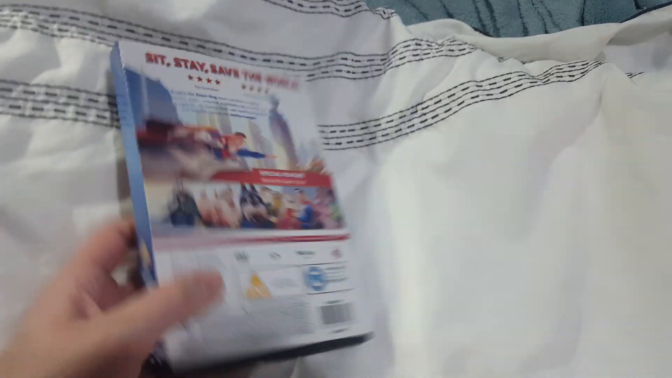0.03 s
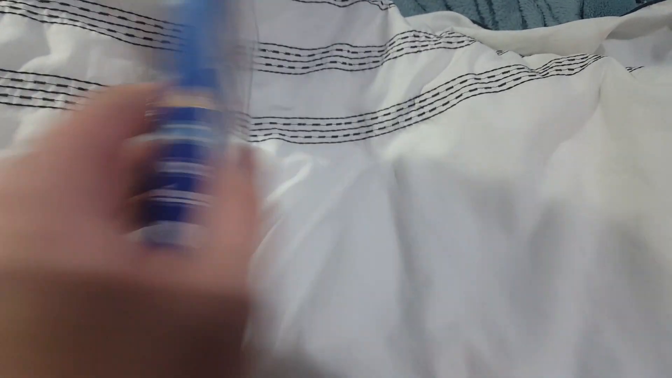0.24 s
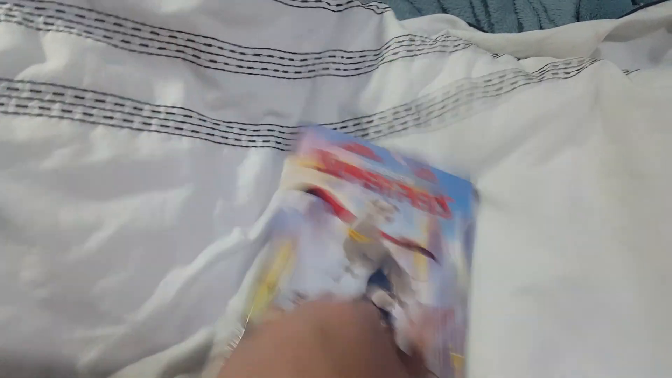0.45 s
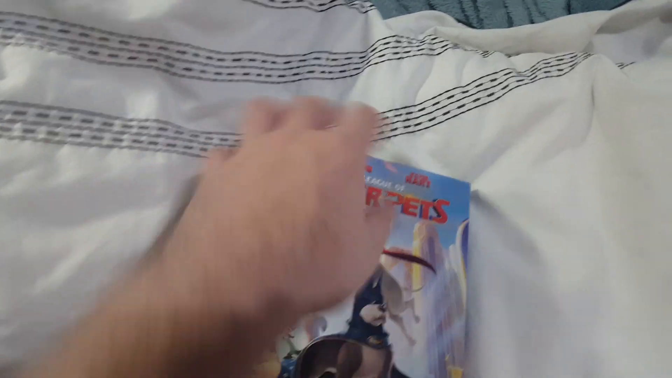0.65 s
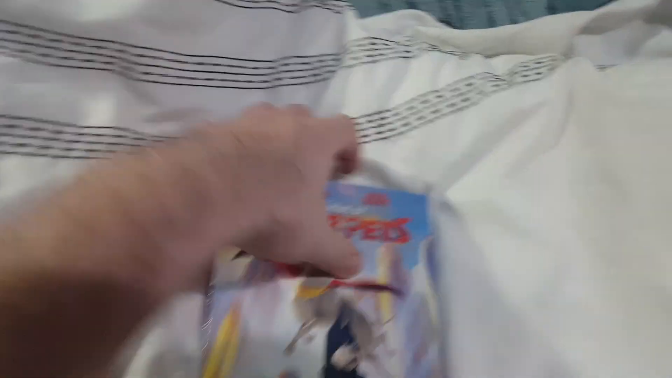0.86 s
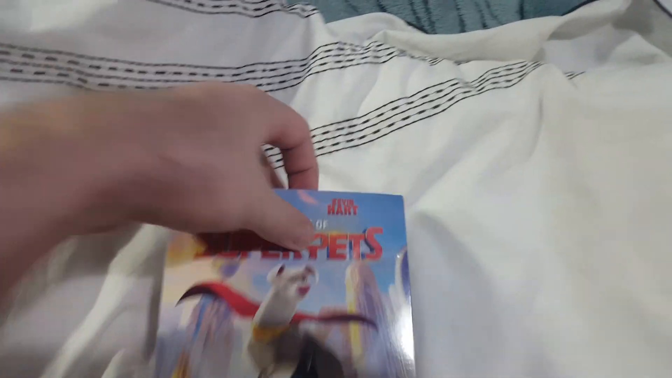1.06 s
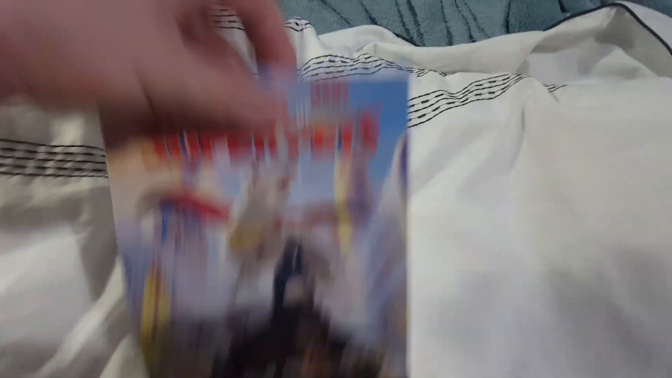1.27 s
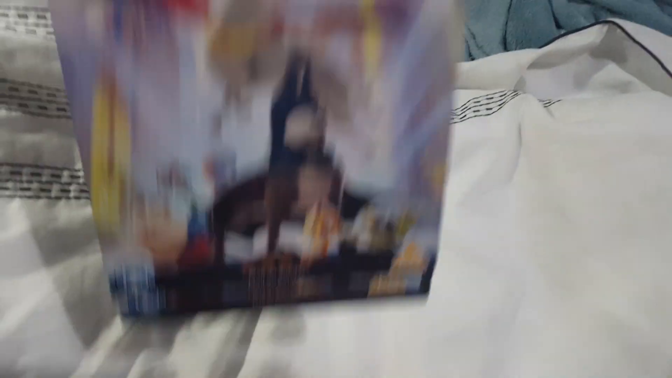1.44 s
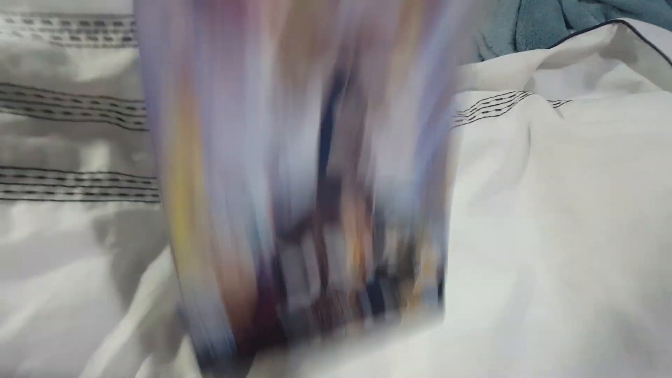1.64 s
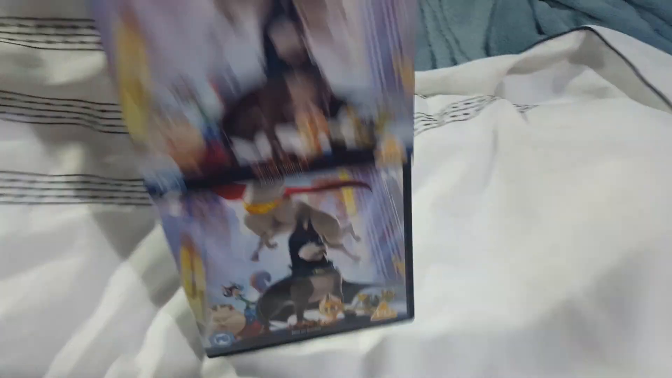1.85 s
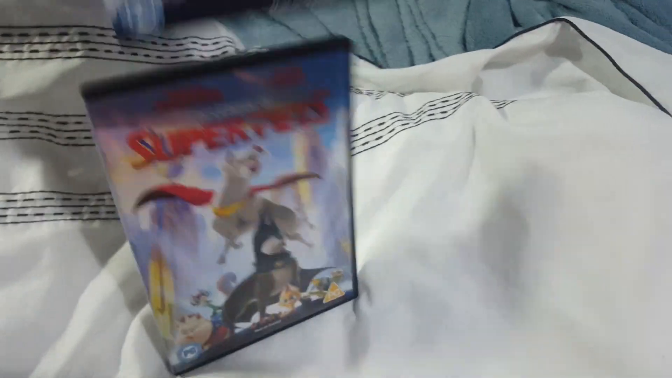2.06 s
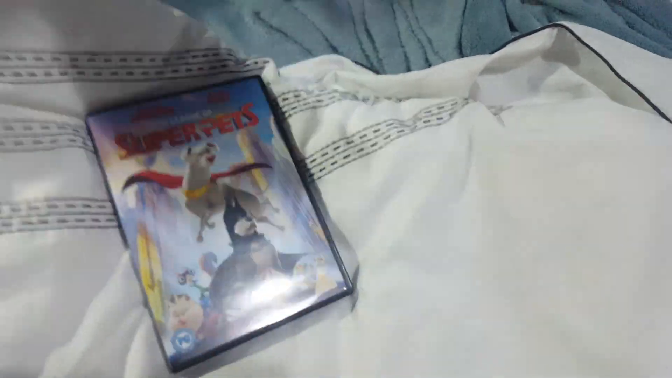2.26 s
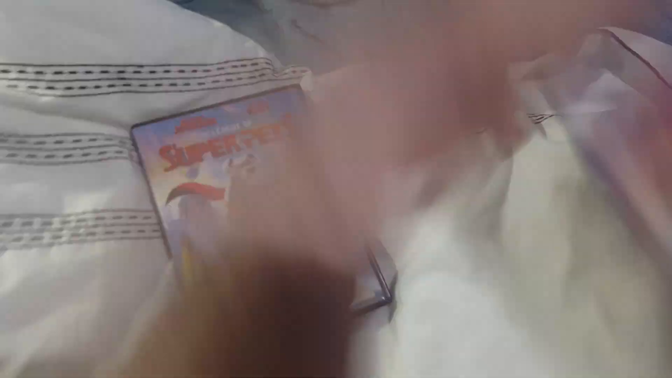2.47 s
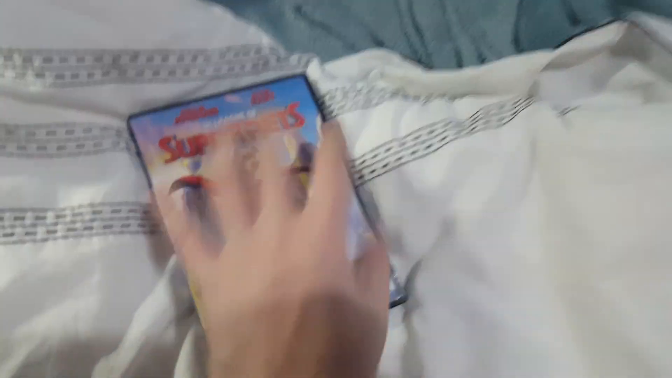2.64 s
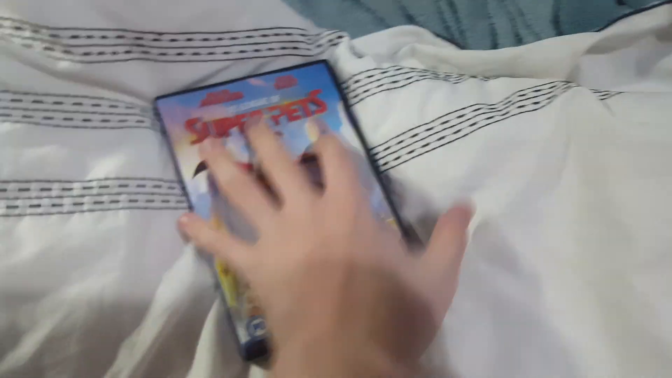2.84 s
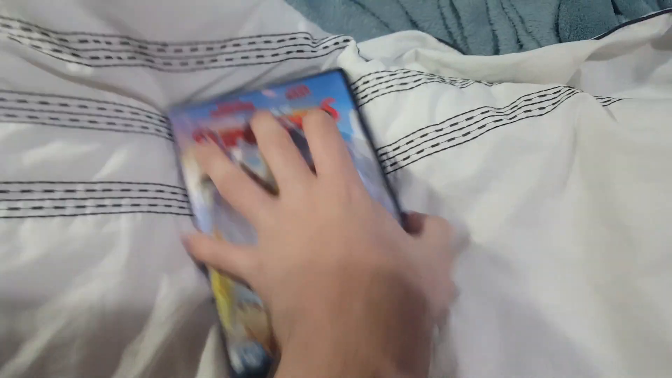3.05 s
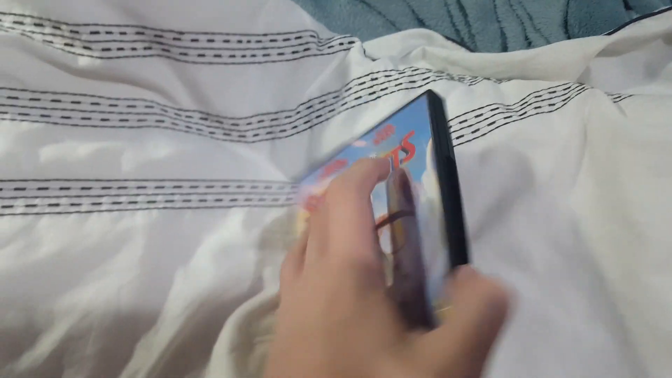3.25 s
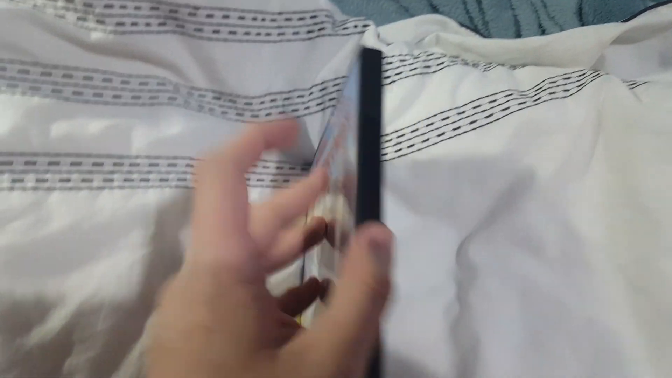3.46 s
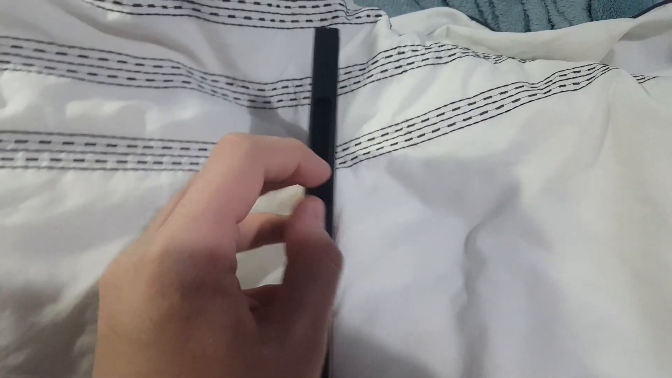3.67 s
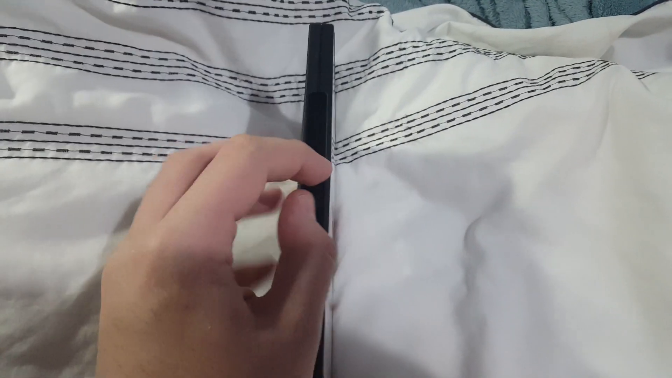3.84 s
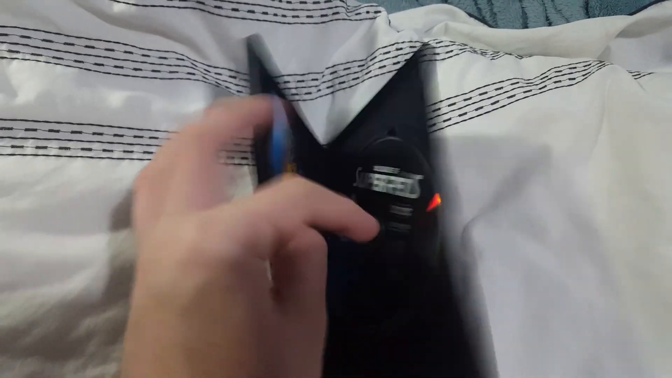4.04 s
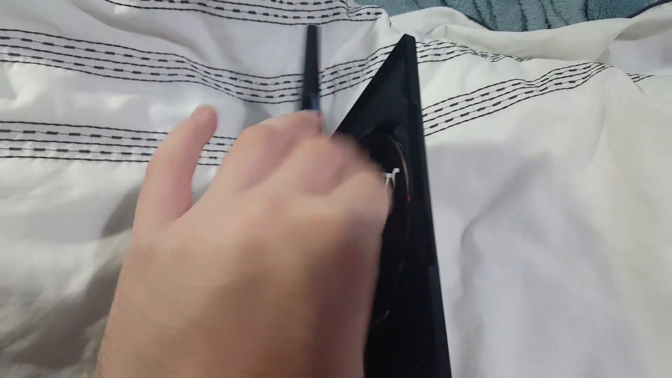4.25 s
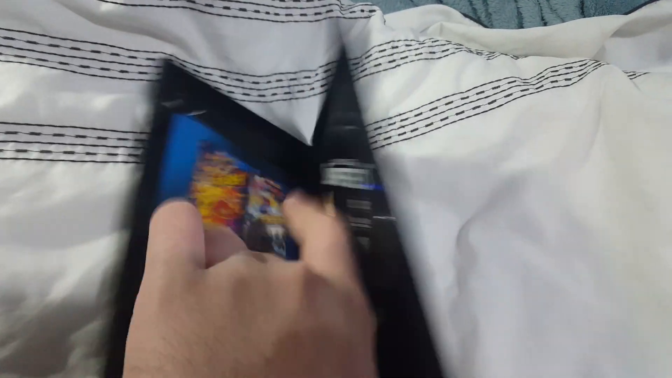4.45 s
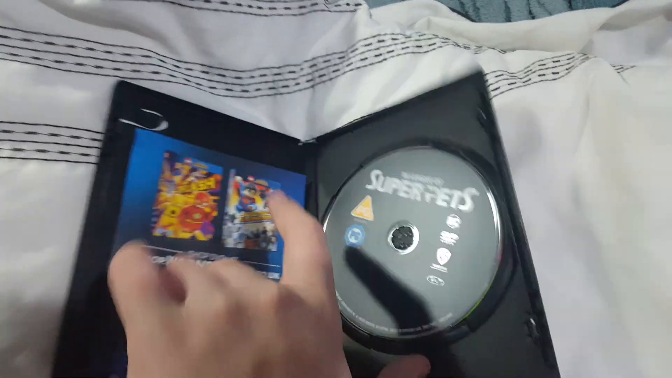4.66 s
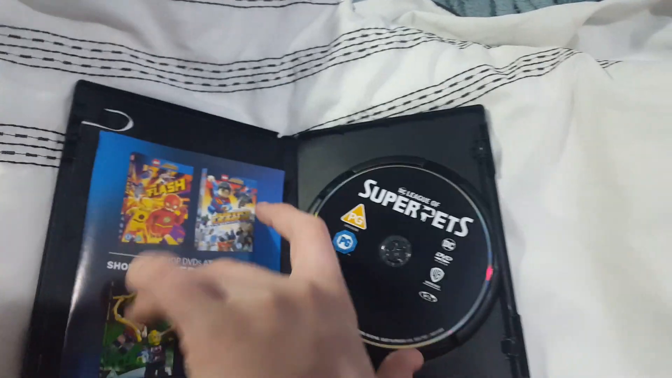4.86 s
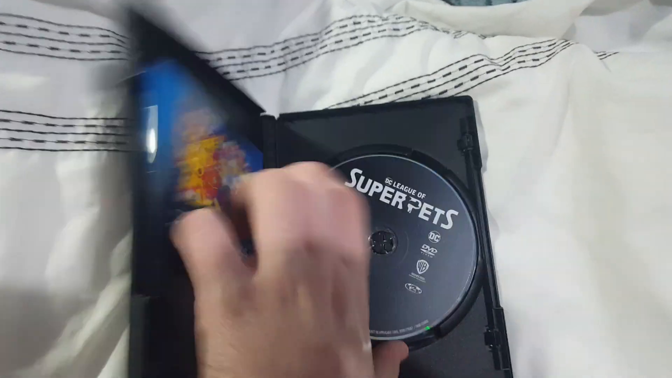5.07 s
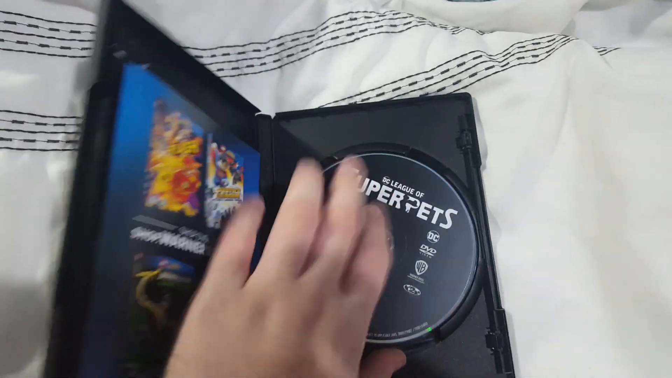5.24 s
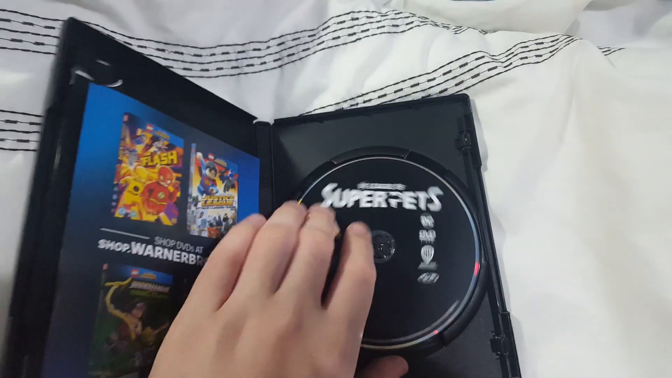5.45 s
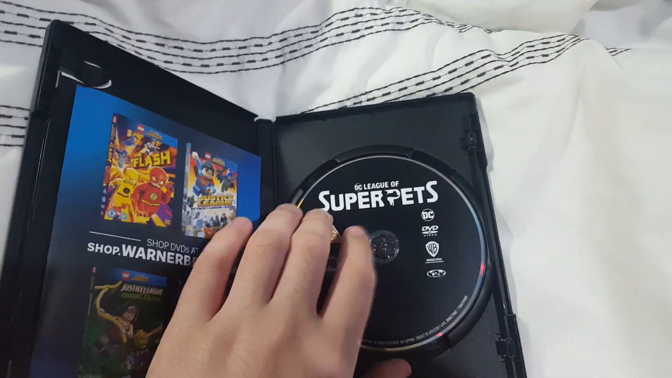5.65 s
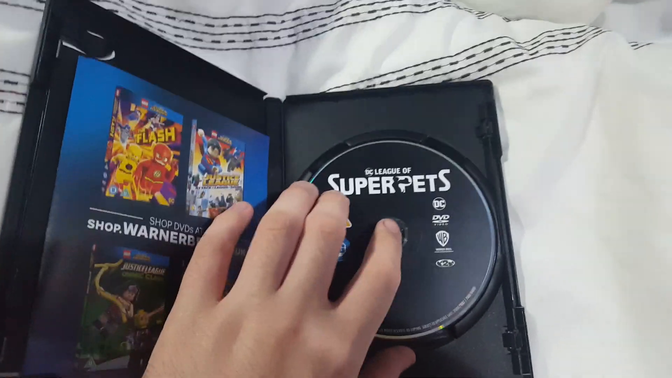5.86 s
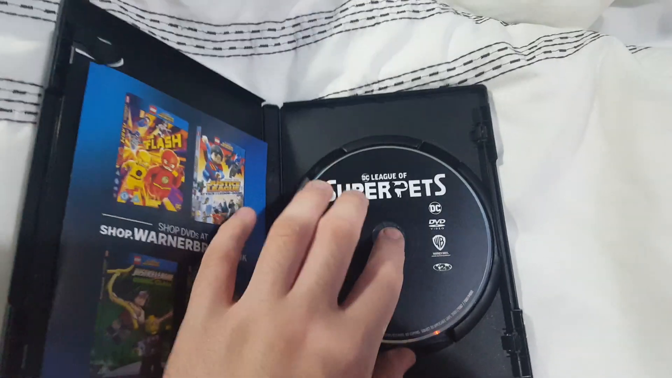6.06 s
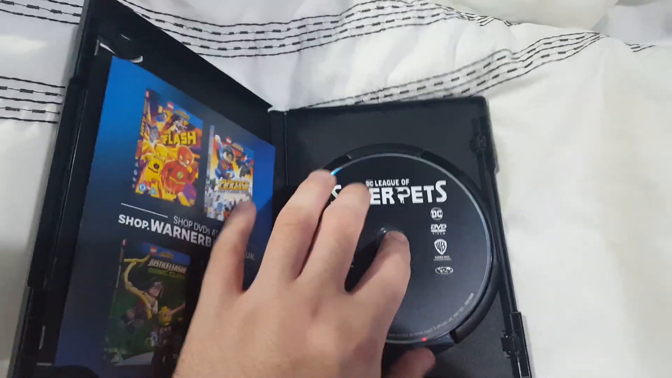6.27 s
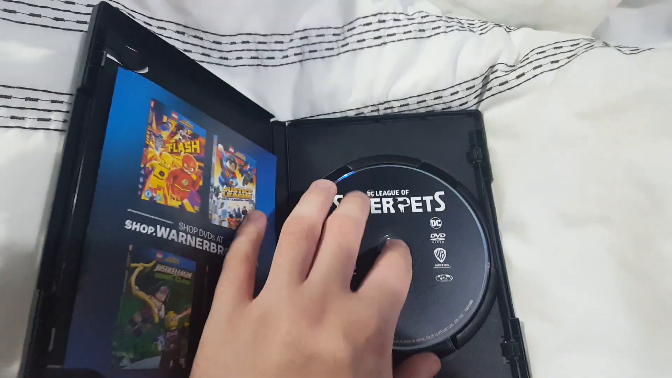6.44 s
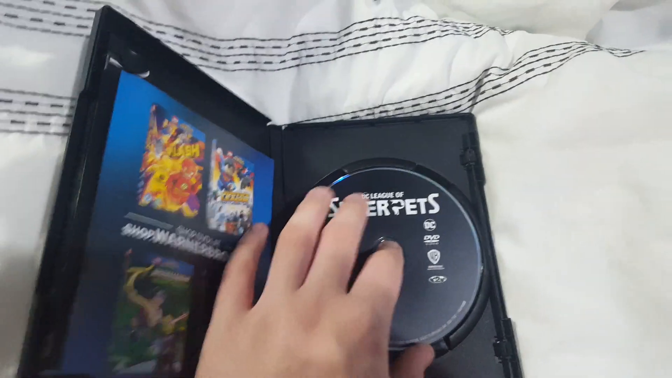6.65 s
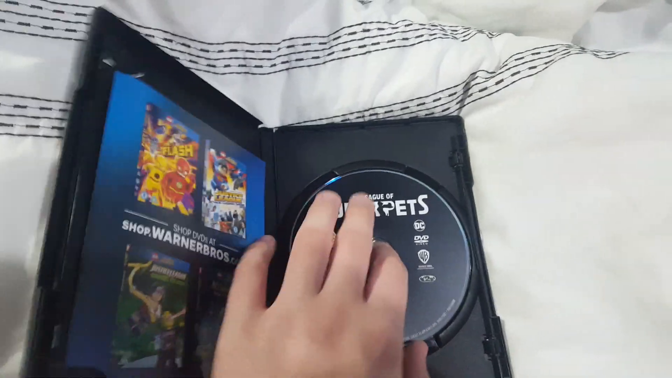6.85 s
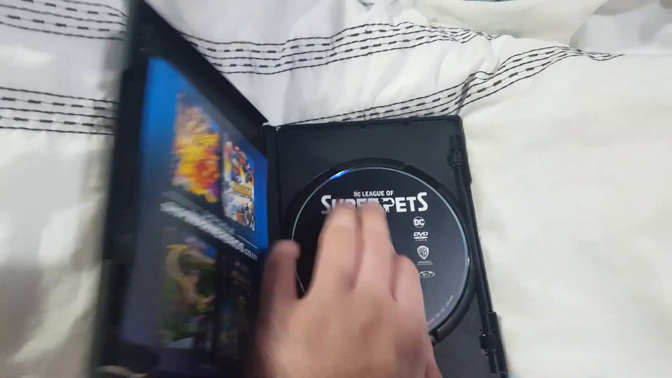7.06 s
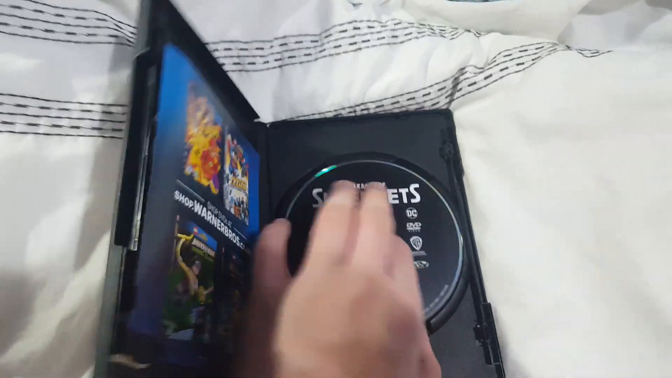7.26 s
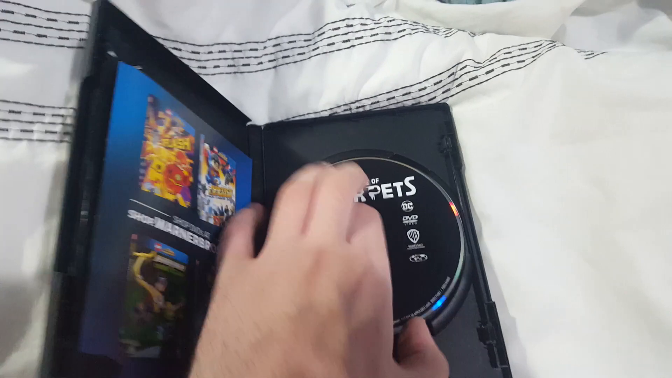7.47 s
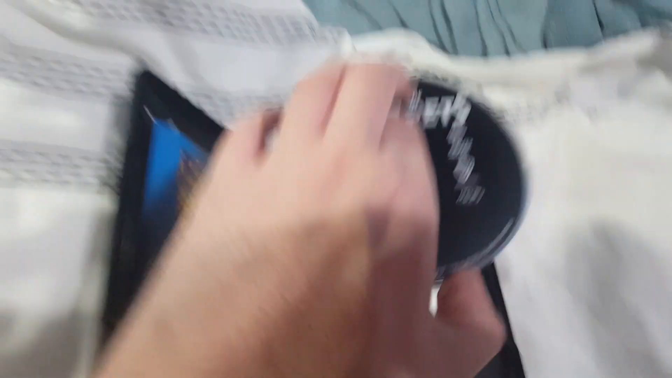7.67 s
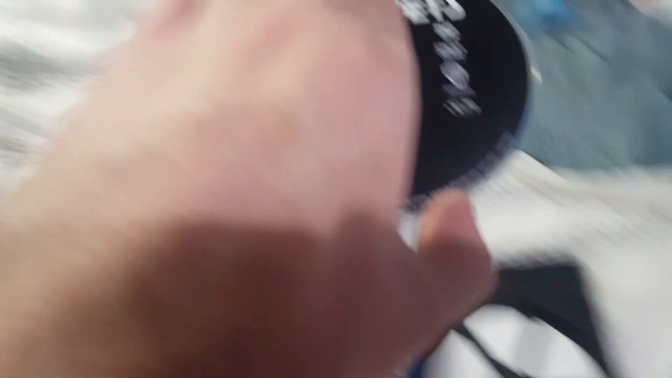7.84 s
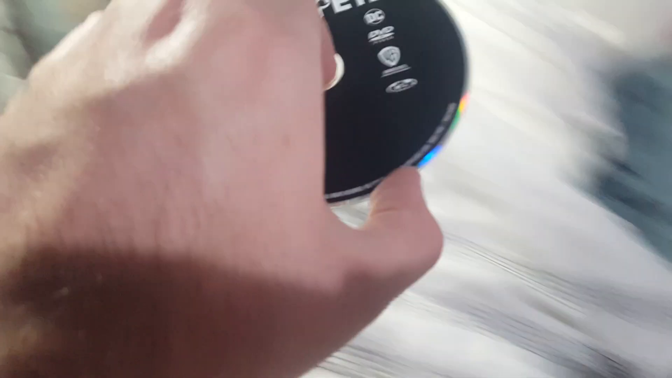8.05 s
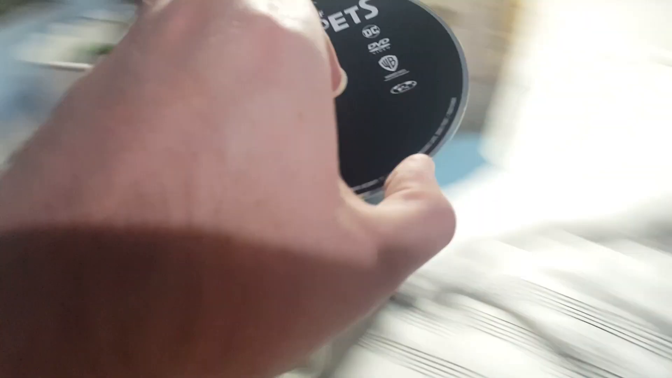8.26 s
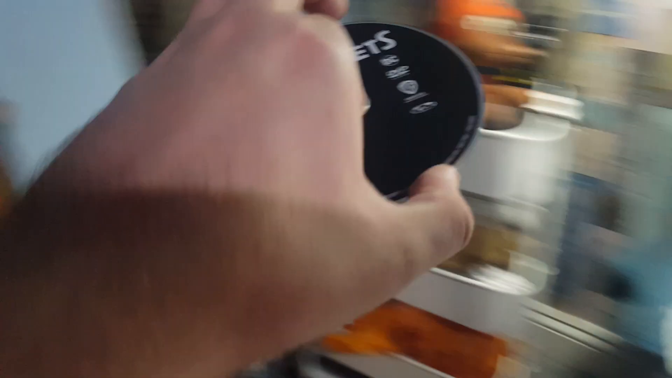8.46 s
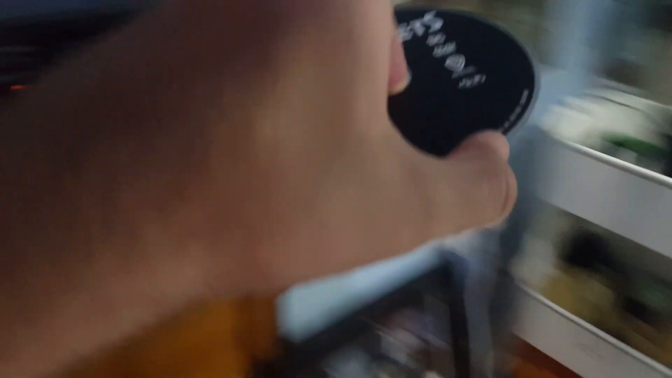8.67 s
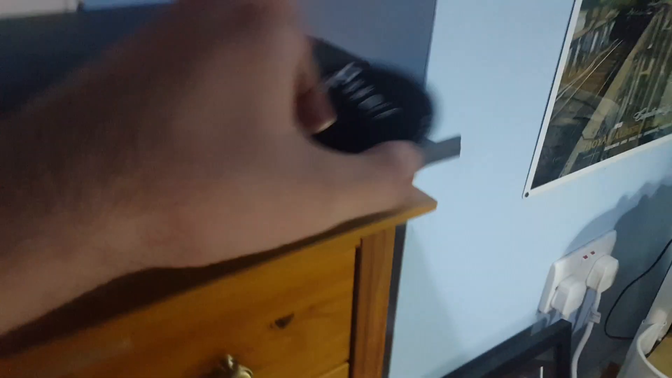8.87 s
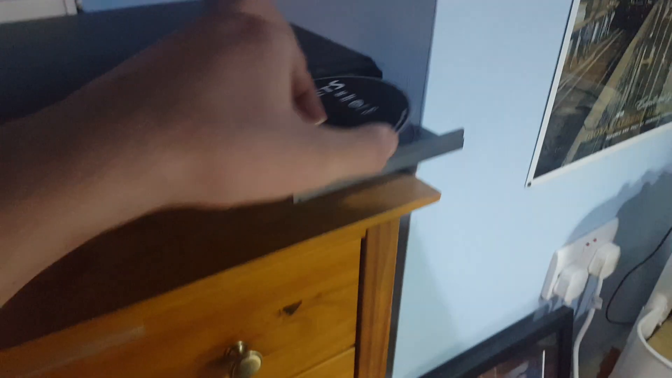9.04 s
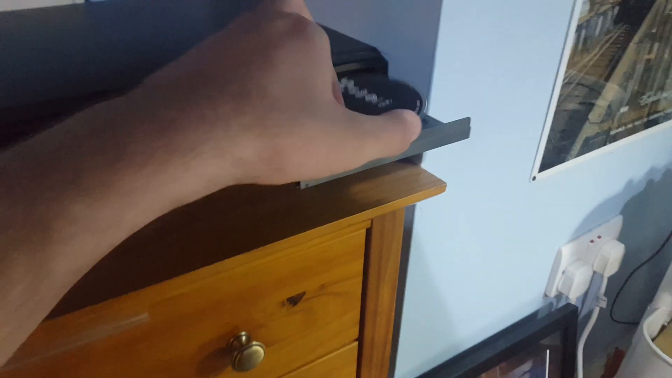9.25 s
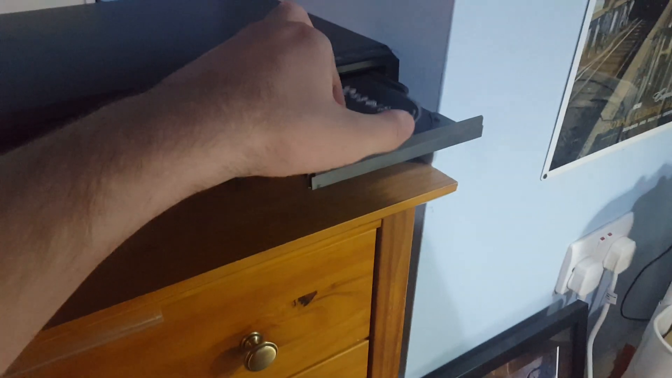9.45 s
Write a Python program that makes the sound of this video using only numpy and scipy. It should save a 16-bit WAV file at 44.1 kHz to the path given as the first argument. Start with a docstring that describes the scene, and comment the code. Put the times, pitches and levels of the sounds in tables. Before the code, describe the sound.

Hands rustle on bedding, slide off a card sleeve, snap open a plastic disc case and click the disc free, close up.

```python
"""On a bed in a small furnished room, a phone's stereo microphone close to a plastic disc case.
Over quiet room tone, hands and bedding rustle and fingers tap the shell. Near 2 s the card sleeve
rubs off; at 4 s the clasps snap open, ringing the shell and thumping the lid. At 6.5 and 7.1 s the
hub lets the disc go with hard clicks. Weight shifts and the bed frame creaks at 8.6 s; last, the
disc is set down and a cabinet hums briefly."""
import sys
import numpy as np
from scipy import signal
from scipy.fft import rfft, irfft, next_fast_len
from scipy.io import wavfile
from scipy.ndimage import map_coordinates

SR = 44100
rng = np.random.default_rng(int(sys.argv[2]) if len(sys.argv) > 2 else 0)


def waveform_to_disk(signal):
    """Save audio, clipped to [-1, 1], as 16-bit WAV at the path in sys.argv[1]."""
    frames = np.transpose(np.atleast_2d(signal))
    scaled = np.clip(frames, -1, 1) * 32767
    samples = np.round(scaled).astype(np.int16)
    wavfile.write(sys.argv[1], SR, samples)


N = 419391

# The room and the microphone
ROOM_DECAY = [(150, 0.27), (1000, 0.14), (5000, 0.15), (13000, 0.15)]  # reverberation: f/Hz, t60/s
ROOM_TONE = [(15, -28.5), (25, 4), (49, -6.5), (373, -13.5), (1440, -39.5), (2050, -27), (5430, -25.5),
             (10000, -33), (13000, -27.5), (16000, -29.5)]  # spectrum of room air and microphone hiss: f/Hz, level/dB
PORT_SHADE = [(60, -4), (180, -3.5), (550, -2), (1650, -7), (4970, -3), (15000, -0.5)]  # the phone body shades its left port: f/Hz, left minus right/dB
PORT_LIKENESS = [(40, .85), (290, .93), (900, .6), (3000, .05), (15000, 0)]  # noise at the two ports: f/Hz, correlation
WHISTLES = [(3.46, -66, 0.073), (3.88, -69, 0.26), (5.85, -70, .3), (6.86, -70.5, .1), (7.29, -69.5, 0.12),
            (7.8, -70.5, .12)]  # airy swells: middle t/s, level/dB, half length/s
BED_CREAKS = [(8.628, -44.5, 255, 0.032), (8.735, -46.5, 243, 0.012)]  # bed frame: middle t/s, level/dB, slip rate/Hz, half length/s

# Hands and bedding, close to the microphone
RUSTLE_LEVEL = [(0, -58.5), (.72, -55.5), (.8, -59), (1.15, -55), (1.59, -64), (1.9, -56), (2.1, -67),
                (2.35, -58), (2.45, -53), (2.8, -53), (2.88, -62), (3.02, -56.5), (3.2, -49), (3.4, -66),
                (4.05, -68), (4.3, -64.5), (4.44, -64), (4.55, -52.5), (4.69, -61.5), (5.12, -67.5),
                (5.45, -55), (5.6, -61.5), (6.17, -69), (7.1, -68.5), (7.3, -66), (7.9, -67.5), (8.3, -61),
                (8.6, -51.5), (8.8, -53.5), (8.97, -47), (9.06, -55.5), (9.3, -65), (9.51, -65.5)]  # how busy the hands are: t/s, level/dB
CLOTH_SPECTRUM = [(120, -28), (200, -4.5), (482, -6), (1680, -9.5), (2090, -6.5), (9750, -28.5),
                  (13000, -30), (15500, -28.5)]  # skin and bedding rubbing: f/Hz, level/dB
GRIP_SPECTRUM = [(12, -37), (20, -9), (92, -1), (146, -0.5), (260, -12.5), (340, -32), (570, -120)]  # handling noise on the phone: f/Hz, level/dB
# hollow, airy resonances near 400 Hz, 2 kHz and 6 kHz: f/Hz, width/Hz, level/dB
AIRY_BANDS = [(390.7, 170, 5), (606, 220, -2.5), (2050, 220, 1.5), (5500, 350, -1.5), (6700, 400, 2.5)]
AIRY_LEVEL = [(0, 0), (1.5, -8), (2.2, -4.5), (2.55, 0.5), (3.25, -3), (3.8, -2), (4.6, -16.5), (5.75, -1),
              (6.2, -9), (6.9, -4.5), (8.1, -13.5), (8.6, -5.5), (8.95, -13.5), (9.51, -7)]  # they swell and fade with the rustle: t/s, level over the rustle/dB
BED_BUMPS = [(0.558, -44.5), (0.818, -41.5), (1.824, -35.5), (2.069, -38.5), (3.036, -50), (4.099, -36.5),
             (4.508, -47), (7.147, -31.5)]  # air and mattress pushed: middle t/s, level/dB

# The sleeve, the case and the disc, close up
SLEEVE_SLIDE = [(1.755, -60.5, -4), (1.775, -44, -12), (1.795, -34, 4.5), (1.825, -30.5, 5),
                (1.88, -37, -2.5), (1.95, -39.5, -7.5), (2.022, -38.5, -7), (2.029, -36, 5),
                (2.048, -32, -4), (2.06, -43.5, -9.5), (2.13, -74, -1)]  # card sliding on plastic: t/s, level/dB, hiss over the rub/dB
SLEEVE_MODES = [(1000, 180, -6), (1680, 190, 0.5), (2844, 1500, -4), (4400, 2100, -9)]  # the hollow sleeve: f/Hz, width/Hz, level/dB
SHELL_MODES = [(1087, 340, 5), (1277, 160, 5.5), (1670, 460, 0.5), (2200, 300, 2), (2530, 220, 0.5),
               (3150, 530, 2), (4030, 1100, -0.5)]  # the plastic shell: f/Hz, width/Hz, level/dB
CAVITY_MODES = [(346, 270, -3.5), (569, 78, -3), (608, 100, -2.5), (930, 289, 1)]  # the air between the lids: f/Hz, width/Hz, level/dB
DISC_MODES = [(670, 90, 20), (2212, 270, 0.5), (2600, 270, -0.5), (3080, 290, 2.5), (4330, 400, 2.5),
              (13000, 3500, 20)]  # the disc on its hub: f/Hz, width/Hz, level/dB
CRACK_SPECTRUM = [(3000, -5.5), (5500, -3), (6500, -0.5), (10000, -9.5), (14000, -10.5), (16000, -11.5)]  # the hard edge of a contact: f/Hz, level/dB
LID_FLEXES = [(0.535, -38), (0.826, -49.5), (1.844, -41.5), (2.587, -48), (2.807, -45.5), (3.119, -46.5),
              (3.703, -49), (4.094, -24.5), (4.121, -33), (4.501, -51.5), (4.765, -48.5), (5.024, -49.5),
              (5.371, -44), (5.529, -51), (6.343, -48.5), (6.553, -30), (7.117, -34.5), (7.1447, -14.5),
              (7.429, -50), (8.119, -53.5)]  # the lid pressed or let go: t/s, level/dB
SQUEAKS = [(1.739, -34, 2597, 0.0067), (3.73, -49.5, 1780, 0.015)]  # sticking plastic: middle t/s, level/dB, f/Hz, half length/s
# card, skin and disc scuffing plastic: t/s, ring level/dB, ring f/Hz, knock over ring/dB, rise/s
SCUFFS = [(0.819, -37, 1640, -0.5, 0.0048), (1.005, -39, 1580, -1, 0.0087), (1.216, -35, 2380, -14, 0.0087),
          (1.61, -42.5, 980, -17, 0.0079), (1.671, -36.5, 1060, 2, 0.0023), (2.45, -37, 1510, -4.5, 0.0059),
          (2.493, -33, 1820, -12, 0.0017), (2.586, -35.5, 1580, -3.5, 0.0032),
          (3.117, -41, 953, 2.5, 0.0035), (3.34, -45.5, 1840, -22, 0.0017),
          (4.134, -25.5, 1270, -3.5, 0.0042), (4.173, -30, 1600, -19, 0.0033),
          (4.345, -48, 4000, -20, 0.006), (4.5, -32, 1320, -3.5, 0.0038), (4.895, -46.5, 1940, -13, 0.0045),
          (5.351, -37.5, 1400, -2, 0.0033), (7.624, -38, 1600, -3.5, 0.0032),
          (8.59, -51.5, 1000, 14.5, 0.0097), (9.348, -33, 1380, -3.5, 0.0031)]
# case, disc and fingers meeting: t/s, ring level/dB, ring f/Hz, knock over ring/dB, crack over ring/dB
CASE_CONTACTS = [(0.068, -40, 1300, -11, -9), (0.245, -41, 1600, -18, -17), (0.334, -41, 1300, -10, -17),
                 (0.535, -28.5, 960, 1.5, -12.5), (0.583, -31.5, 1850, -0.5, -16),
                 (0.805, -36.5, 1080, -1, -1), (0.918, -37, 1710, -33, -3), (1.023, -26, 1500, -7, -3.5),
                 (1.143, -41.5, 1100, 0.5, -20), (1.831, -11, 1070, -10, -14),
                 (1.844, -11.5, 1660, -16.5, -10), (2.05, -21.5, 1650, -3.5, -7),
                 (2.404, -35.5, 1310, -2, -21), (2.777, -35, 1160, 7, 0.5), (2.784, -32.5, 1070, -5, -23),
                 (2.807, -35, 1550, 0, -15), (3.547, -43.5, 1660, -9, -9), (3.702, -41, 1690, -3.5, -3),
                 (4.047, -53, 2075, 7, -10.5), (4.085, -10, 1760, -9, -7), (4.094, -5.5, 1910, -11, -14),
                 (4.107, -16.5, 1300, -10, -13), (4.112, -12, 2100, -9, 2.5), (4.123, -17.5, 1213, -4, -13),
                 (4.157, -29.5, 1500, -6.5, -5), (4.182, -29, 1350, -5, -1.5), (4.23, -33.5, 1650, -8, -7),
                 (4.476, -44, 1220, -10, 1), (4.499, -32.5, 1360, -3, 2), (4.518, -38.5, 3100, -6, -12),
                 (4.547, -33.5, 1020, -12, -2), (4.578, -39, 2100, -2.5, -1),
                 (4.629, -26, 1990, -9.5, -8.5), (4.671, -44.5, 3100, -15, -3),
                 (4.738, -39.5, 1150, -8, -0.5), (4.766, -40.5, 1760, -5, -15),
                 (4.901, -42.5, 3000, -18.5, 0), (5.02, -42, 1370, 3.5, -6.5), (5.179, -41.5, 3950, -1, -1),
                 (5.198, -35.5, 3000, -4.5, 6.5), (5.36, -27, 1490, -2.5, -22),
                 (5.386, -24.5, 2220, -6.5, -27), (5.417, -41, 1320, -5, -25), (5.442, -39, 1360, -10, -21),
                 (5.88, -44.5, 3060, -4.5, -25), (6.174, -43, 1306, 0.5, -35),
                 (6.648, -30.5, 1880, -9, -5.5), (7.431, -40, 1545, -1, -12.5),
                 (7.606, -37, 1300, -14, -22), (7.625, -33.5, 1460, -7.5, -16),
                 (7.637, -34.5, 2400, -5.5, -9), (8.819, -43.5, 1010, 10.5, -18)]
# hub teeth grip and let go: t/s, ring level/dB, ring f/Hz, knock over ring/dB, crack over ring/dB
HUB_CONTACTS = [(6.5527, -6, 3150, -4, -1.5), (7.1185, -6.5, 2550, -12, -7),
                (7.142, -4.5, 3400, -10.5, -1.5), (7.156, -17.5, 2240, -18, -15.5)]


def amp(db):
    """dB to gain."""
    return 10 ** (np.asarray(db) / 20)


def unit(x):
    """x at rms 1."""
    return x / np.sqrt(np.mean(x ** 2) + 1e-20)


def along(points, hz):
    """Read (f/Hz, value) points on a log frequency axis."""
    f, values = np.transpose(points)
    return np.interp(np.log(hz + 1), np.log(f + 1), values)


def curves(rows):
    """One level per sample for each column after the time; -120 dB outside the rows."""
    times, *columns = np.transpose(rows)
    return [np.interp(np.arange(N) / SR, times, db, left=-120, right=-120) for db in columns]


def wobble(rate):
    """A smooth random curve, rate knots a second."""
    return map_coordinates(rng.standard_normal(int(N * rate / SR) + 4), [np.arange(N) * rate / SR])


def mode(f, hz, width_hz):
    """Causal response of one resonance."""
    return 1j * f * width_hz / (hz * hz - f * f + 1j * f * width_hz)


def modes(table, f, weight_db=lambda hz: 0):
    """Sum of resonances with alternating sign."""
    return sum((-1) ** k * amp(db + weight_db(hz)) * mode(f, hz, width)
               for k, (hz, width, db) in enumerate(table))


def filtered(x, response):
    """x through a complex frequency response."""
    size = next_fast_len(x.shape[-1] + 8192)
    return irfft(rfft(x, size) * response(np.fft.rfftfreq(size, 1 / SR)), size)[..., :x.shape[-1]]


def friction(response, grain_db):
    """Noise of rms 1 in short grains, as fibres catch; the ports are alike in the bass only."""
    grains = amp(grain_db * (wobble(250) + 2.1 * wobble(40)))
    noise = grains * rng.standard_normal((2, N))
    spread = lambda f: np.arccos(np.clip(along(PORT_LIKENESS, f), -1, 1)) / 2
    mid, side = filtered(noise, lambda f: response(f) * [np.cos(spread(f)), np.sin(spread(f))])
    return unit(np.array([mid + side, mid - side]))


def swells(table, shape):
    """Sum of short shapes, each under a smooth swell; u runs from -1 to 1 across it."""
    t, out = np.arange(N) / SR, np.zeros(N)
    for middle, db, *more, half_s in table:
        span = slice(max(round((middle - half_s) * SR), 0), round((middle + half_s) * SR))
        u = (t[span] - middle) / half_s
        out[span] += amp(db) * np.cos(np.pi * u / 2) ** 2 * shape(t[span] - middle, u, *more)
    return out


def room_tails(count):
    """The room's answer, new for each contact and port; each frequency dies at its own speed."""
    f, t, spectra = signal.stft(rng.standard_normal((count, 2, SR // 5)), SR, nperseg=256)
    decay = amp(-60 * t / along(ROOM_DECAY, f)[:, None])
    tail = signal.istft(spectra * decay, SR, nperseg=256)[1]
    tail *= np.clip(np.arange(tail.shape[-1]) / SR / 0.0018, 0, 1)  # the first walls arrive late
    return tail / np.linalg.norm(tail, axis=-1, keepdims=True)


def room_tone():
    """Room air and microphone hiss, under everything."""
    return amp(-71) * friction(lambda f: amp(along(ROOM_TONE, f)), grain_db=.1)


def mains_hum(hz=92):
    """An appliance hums faintly in the room, wavering in level and phase."""
    level = amp(-75.5 + 2 * wobble(4.7))
    return level * np.sin(2 * np.pi * hz * np.arange(N) / SR + .6 * wobble(5.4))


def whistle():
    """A thin airy whistle comes and goes in the background: narrow noise under slow swells."""
    narrow = friction(lambda f: mode(f, hz=2080, width_hz=98) ** 2, grain_db=-1.0)
    return swells(WHISTLES, lambda t, u: 1) * narrow


def cabinet(middle_s=9.39, db=-50, hz=168, half_s=.05):
    """The disc set down makes the cabinet under the tray hum once."""
    return swells([(middle_s, db, half_s)], lambda t, u, hz=hz: (1 - 0.34 * u) * np.sin(2 * np.pi * hz * t))


def bed_creaks(overtone_step_db=-3.5):
    """Weight shifts off the bed and the frame slips in short buzzes of four harmonics."""
    def buzz(t, u, hz):
        return sum(amp(overtone_step_db * k) * np.sin(2 * np.pi * (k + 1) * hz * t) for k in range(4))
    return swells(BED_CREAKS, buzz)


def bed_bumps(half_s=0.01):
    """Low pushes of air and mattress reach the phone."""
    return swells([(*row, half_s) for row in BED_BUMPS], lambda t, u: np.sin(5.6 * u))


def hands(middling_db=-58, rumble_follows=0.74):
    """Skin and bedding rustle close by, with hollow, airy resonances; the grip on the phone rumbles."""
    rustle_db, = curves(RUSTLE_LEVEL)
    cloth_colour = lambda f: amp(along(CLOTH_SPECTRUM, f))
    cloth = friction(cloth_colour, grain_db=.85)
    bands = lambda f: sum(amp(db) * np.abs(mode(f, hz, width)) ** 2 for hz, width, db in AIRY_BANDS)
    airy = friction(lambda f: cloth_colour(f) * bands(f), grain_db=0.5)
    airy_db = curves(AIRY_LEVEL)[0] + 1.2 * wobble(3.4)
    lumps = amp(3.5 * wobble(14)) * friction(lambda f: amp(along(GRIP_SPECTRUM, f)), grain_db=.3)
    rumble_db = -65 + rumble_follows * (rustle_db - middling_db)
    return amp(rustle_db) * (cloth + amp(airy_db) * airy) + amp(rumble_db) * unit(lumps)


def sleeve():
    """Card drags along the case: a hollow rub and a fine hiss."""
    rub_db, hiss_db = curves(SLEEVE_SLIDE)
    hiss_colour = lambda f: amp(along(CRACK_SPECTRUM, f)) * mode(f, hz=5500, width_hz=13000)
    hiss = friction(hiss_colour, grain_db=.7)
    rub = friction(lambda f: modes(SLEEVE_MODES, f), grain_db=1.2)
    return amp(rub_db) * (rub + amp(hiss_db) * hiss)


def squeaks():
    """Plastic sticks and sings; the stick-slip period wanders."""
    drift = lambda t: np.cumsum(.11 * rng.standard_normal(len(t)))
    return swells(SQUEAKS, lambda t, u, hz: np.sin(2 * np.pi * hz * t + drift(t)))


def lid_thumps(rise_s=0.00092, room_db=-17):
    """A short push and its rebound set the broad lid swinging."""
    u = np.arange(SR // 8) / SR / rise_s
    push_and_rebound = np.diff(u * np.exp(-u), prepend=0)
    swing = filtered(push_and_rebound, lambda f: mode(f, hz=177, width_hz=35))
    pushes = np.zeros(N)
    for start, db in LID_FLEXES:
        pushes[round(start * SR)] = amp(db) / np.abs(swing).max()
    direct = signal.fftconvolve(pushes, swing)[None, :N]
    room = signal.fftconvolve(direct, room_tails(1)[0], axes=1)[:, :N]
    return direct + amp(room_db) * room


def touches(table, body, focus_db, room_db, clean_break):
    """Each push is a burst of slips that rings the body, knocks the air inside and cracks."""
    t, out = np.arange(SR // 8) / SR, np.zeros((2, N + SR))
    unit_peak = lambda x: x / np.abs(x).max()
    for (start, db, hz, knock_db, crack_db, rise_s), tail in zip(table, room_tails(len(table))):
        u = t / rise_s
        push = u ** 2 * np.exp(-u)
        slips = push * rng.standard_normal((3, len(t)))
        shared, per_port = slips[0], slips[1:]
        shared[round(2 * rise_s * SR)] += clean_break  # one big slip at the height of the push
        focus = focus_db * np.clip(1 + db / 70, .2, 1)  # a light touch rings more broadly
        drive_db = lambda mode_hz: -focus * np.log2(mode_hz / hz) ** 2  # far modes are driven less
        ring_colour = lambda f: modes(body, f, drive_db) * mode(f, hz, 4.2 * hz)
        ring = unit_peak(filtered(shared + .6 * per_port, ring_colour))
        knock = unit_peak(filtered(shared + 0.048 * per_port, lambda f: modes(CAVITY_MODES, f)))
        crack = unit_peak(filtered(per_port, lambda f: amp(along(CRACK_SPECTRUM, f))))
        direct = amp(db) * (ring + amp(knock_db) * knock + amp(crack_db) * crack)
        room = amp(room_db) * signal.fftconvolve(direct, tail, axes=1)
        i = round(start * SR)
        out[:, i:i + len(t)] += direct
        out[:, i:i + room.shape[1]] += room
    return out[:, :N]


def scuffs(crack_db=-9.5, crack_db_per_ms=-0.06):
    """Card, skin and disc brush the shell; a slower scuff is duller."""
    rows = [(*row, crack_db + crack_db_per_ms * 1000 * rise_s, rise_s) for *row, rise_s in SCUFFS]
    return touches(rows, SHELL_MODES, focus_db=2.0, room_db=-1.5, clean_break=4.5)


def with_rise(contacts, snap_rise_s=.0003, snap_db=-8.5, slower_s_per_db=.000012):
    """Add a rise time to each contact: hard snaps are fastest, lighter ones start more softly."""
    return [(*row, snap_rise_s + slower_s_per_db * max(snap_db - row[1], 0)) for row in contacts]


def case_clicks():
    """Taps and snapping clasps ring the plastic shell, close to the microphone."""
    return touches(with_rise(CASE_CONTACTS), SHELL_MODES, focus_db=12, room_db=-4.0, clean_break=8)


def hub_clicks():
    """The hub teeth grip and let go, ringing the disc, close to the microphone."""
    return touches(with_rise(HUB_CONTACTS), DISC_MODES, focus_db=8, room_db=-5.0, clean_break=11)


def scene():
    """The quiet room behind; case, sleeve and hands up close on the bed."""
    background = room_tone() + mains_hum()
    case = squeaks() + case_clicks() + hub_clicks() + scuffs() + lid_thumps()
    furniture = cabinet() + bed_creaks() + bed_bumps()
    return background + furniture + case + sleeve() + hands() + whistle()


def record(dry, right_lag_s=.00005, ceiling=.93, top_hz=16200):
    """The phone's microphone: left port shaded, right a little farther away, the top treble cut off."""
    lag = lambda f: np.exp(-2j * np.pi * f * np.array([[0], [right_lag_s]]))
    shade = lambda f: amp(along(PORT_SHADE, f) * np.array([[.5], [-.5]]))
    band_limit = lambda f: np.clip((top_hz - f) / 200, 0, 1) ** 2
    at_ports = filtered(dry, lambda f: lag(f) * shade(f))
    saturated = at_ports / (1 + np.abs(at_ports / ceiling) ** 6) ** (1 / 6)  # loud peaks round off
    return filtered(saturated, band_limit)


dry = scene()
out = record(dry)
waveform_to_disk(out)
```